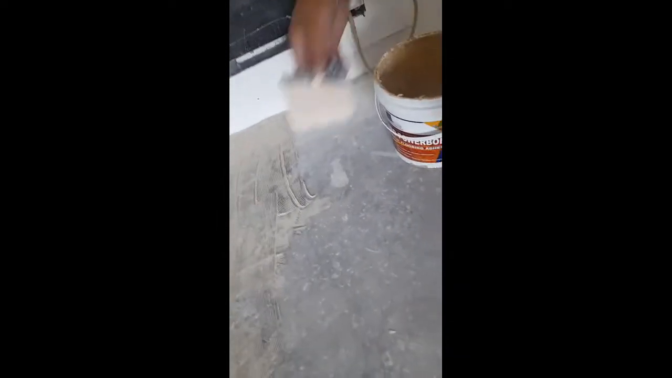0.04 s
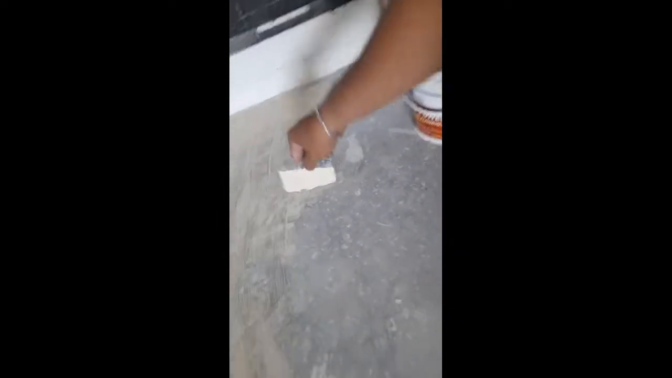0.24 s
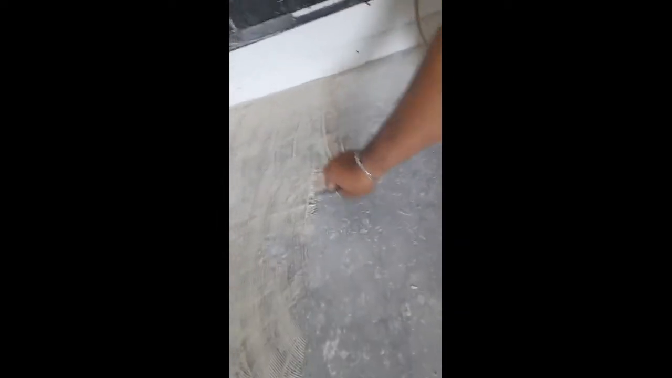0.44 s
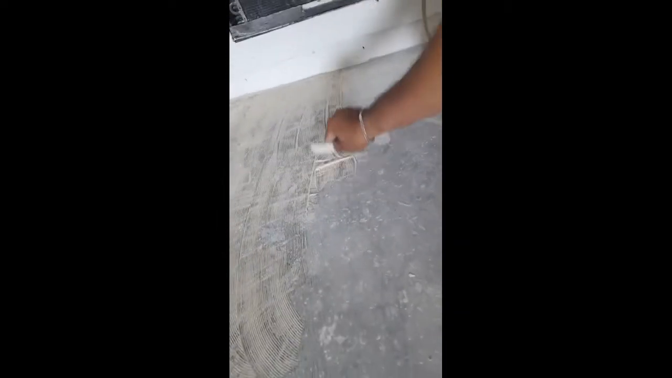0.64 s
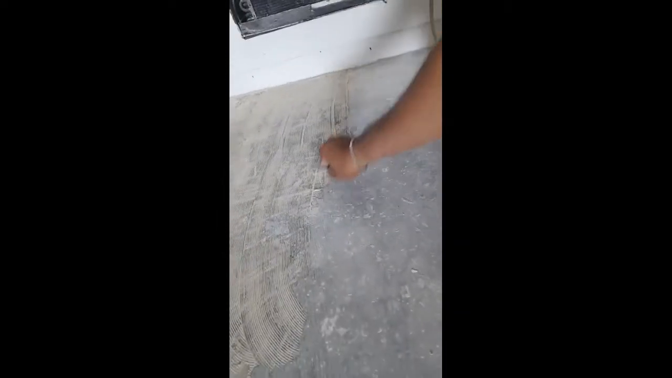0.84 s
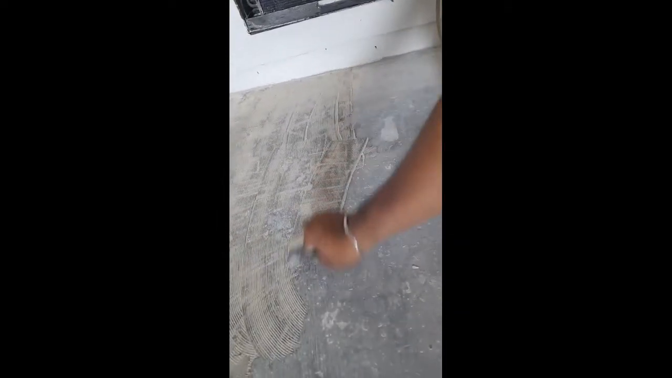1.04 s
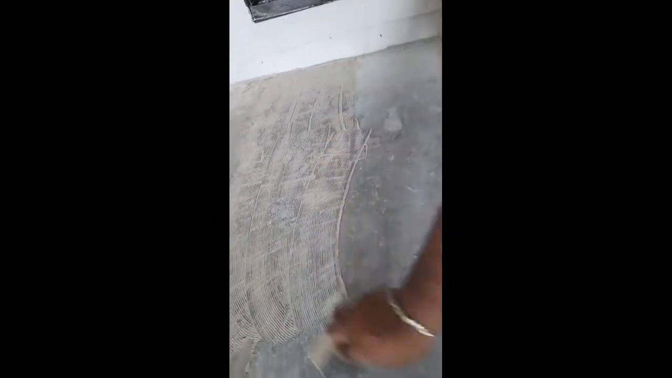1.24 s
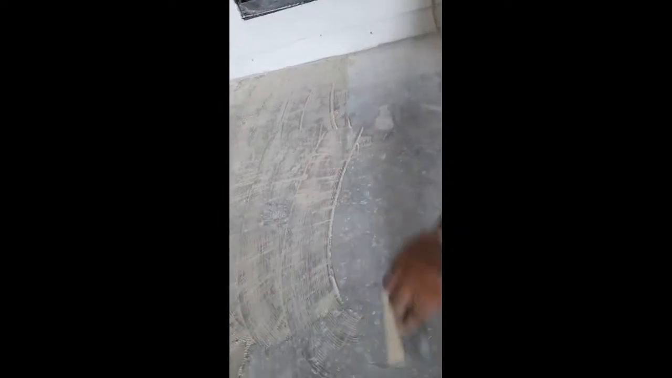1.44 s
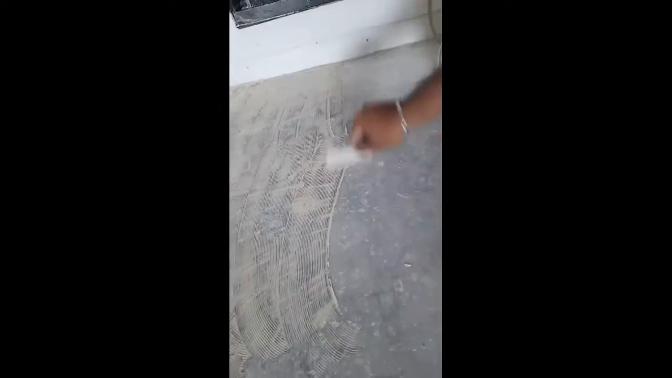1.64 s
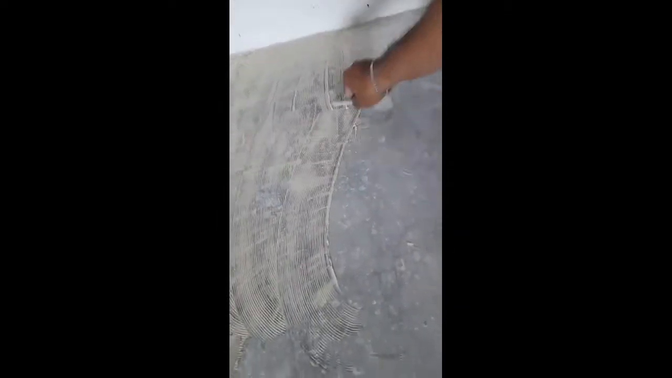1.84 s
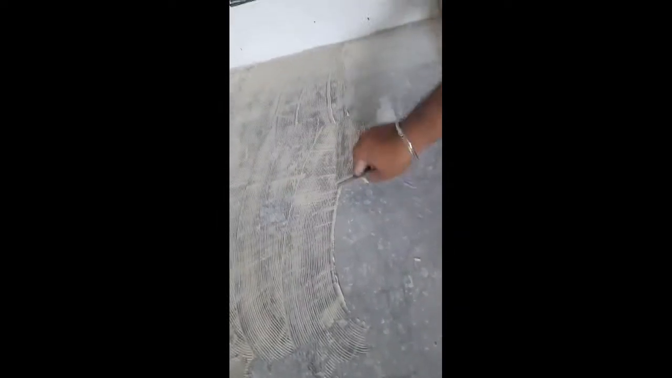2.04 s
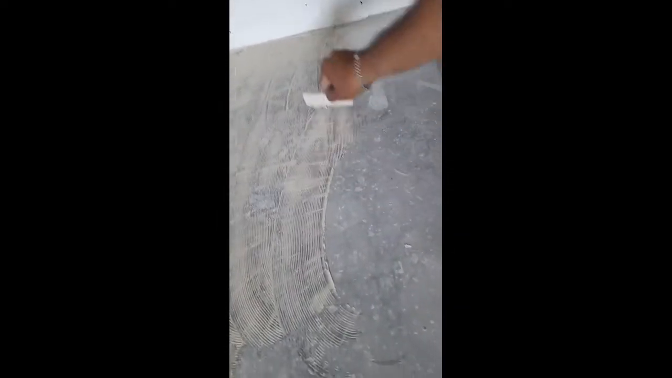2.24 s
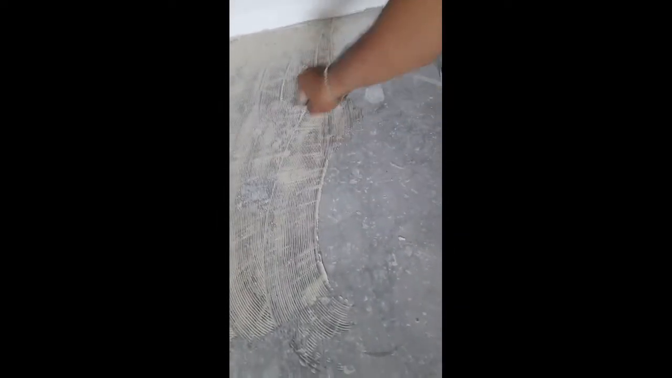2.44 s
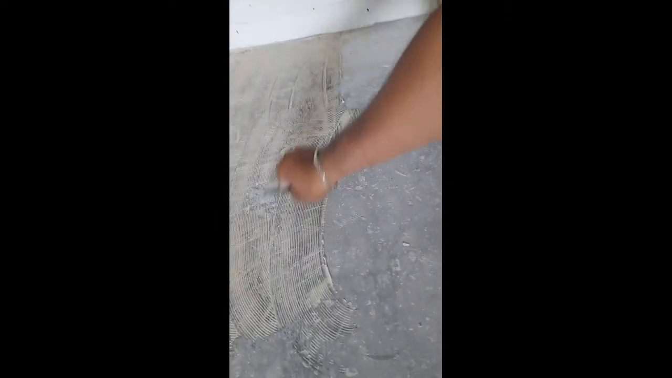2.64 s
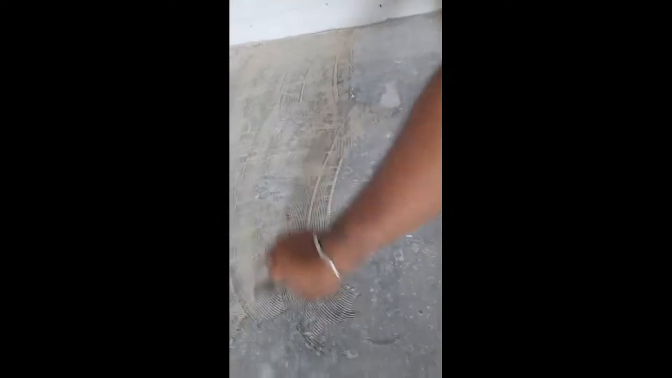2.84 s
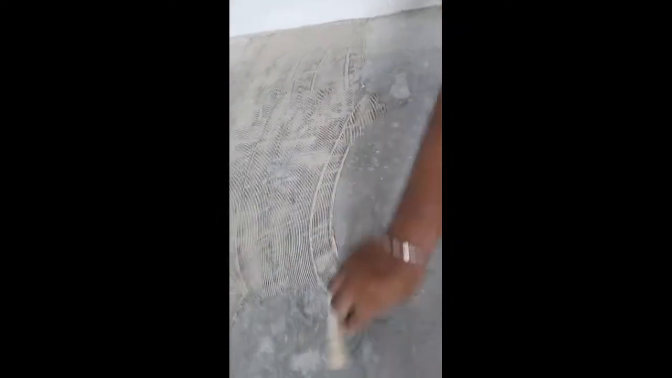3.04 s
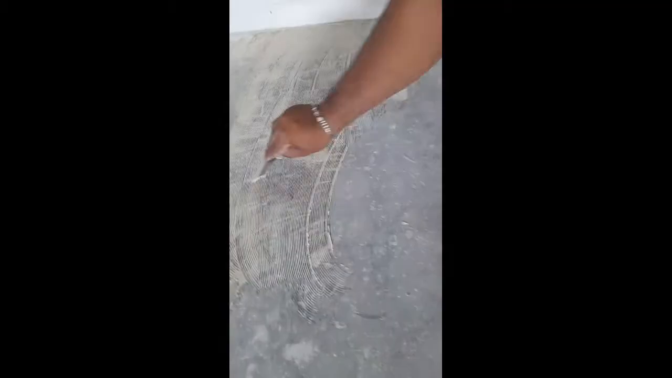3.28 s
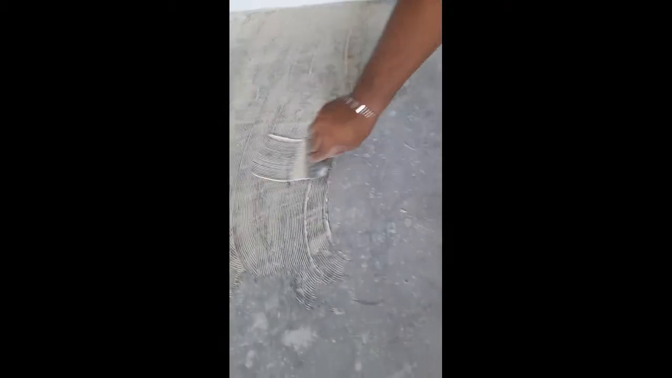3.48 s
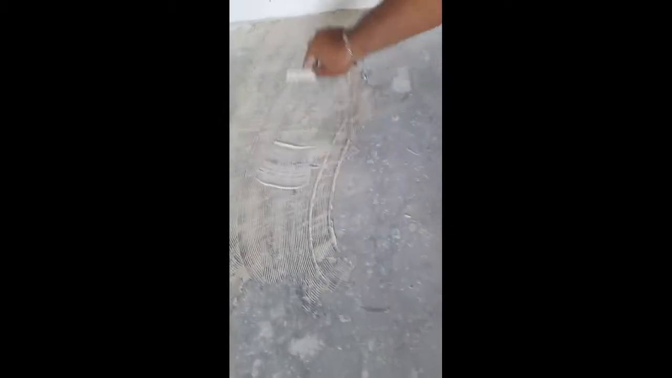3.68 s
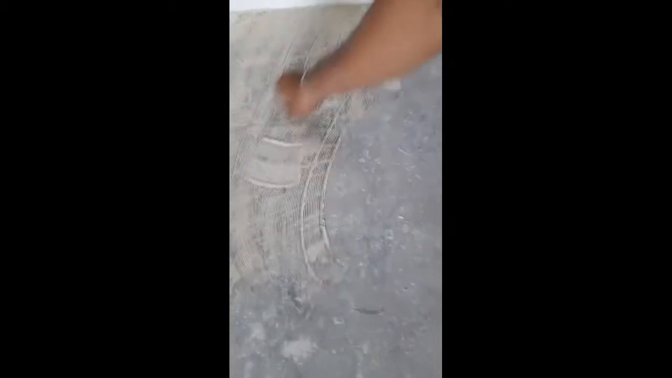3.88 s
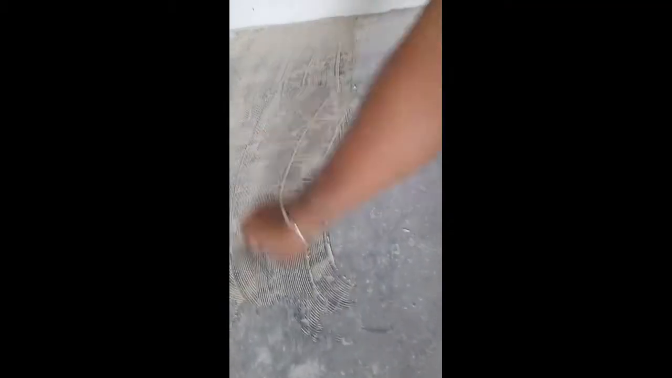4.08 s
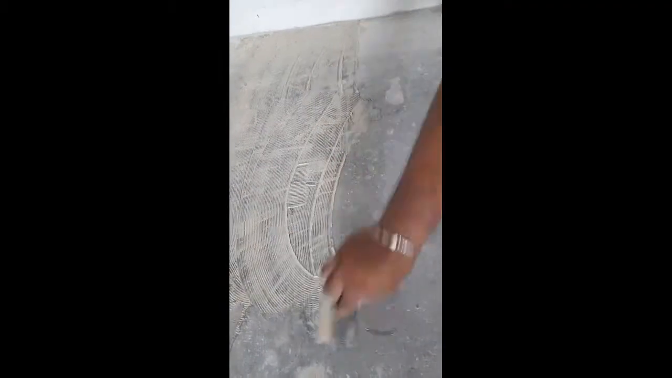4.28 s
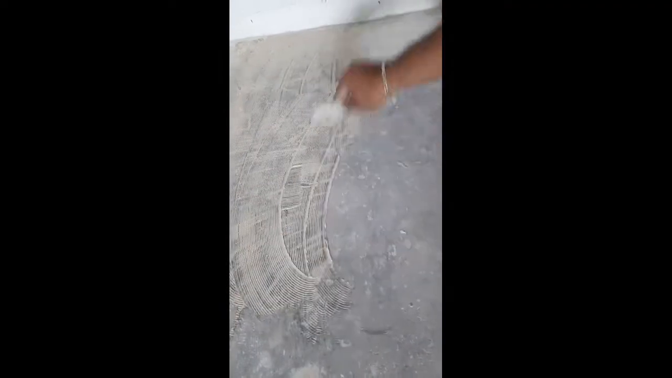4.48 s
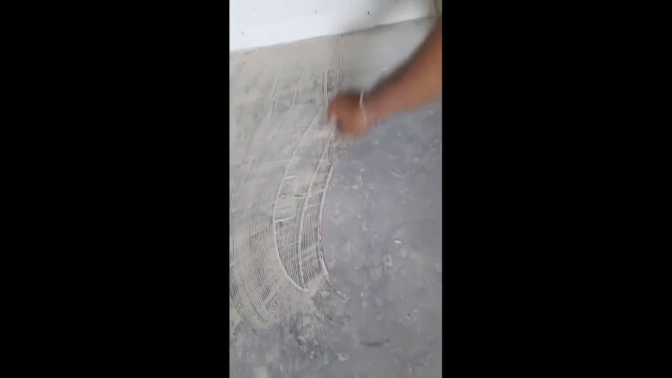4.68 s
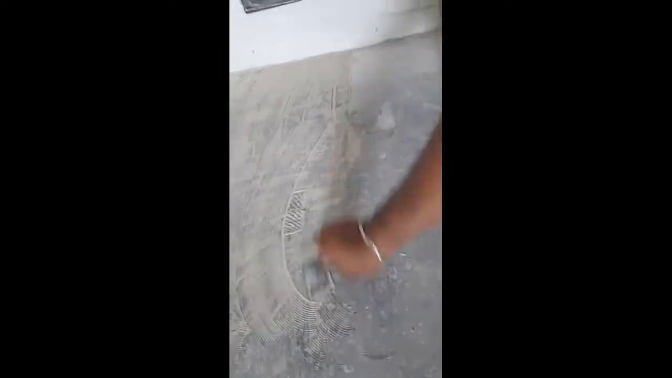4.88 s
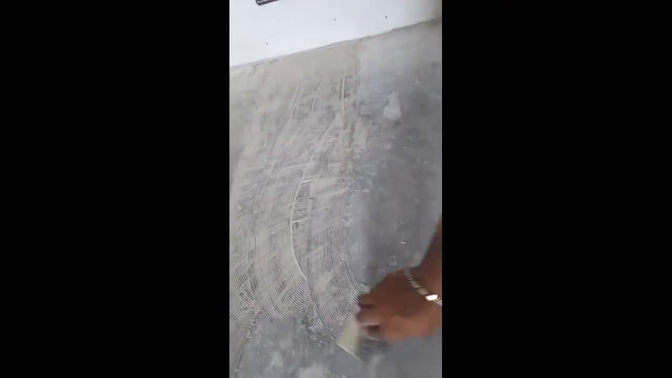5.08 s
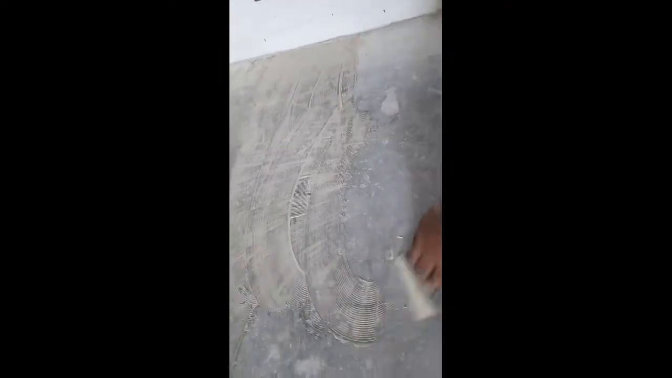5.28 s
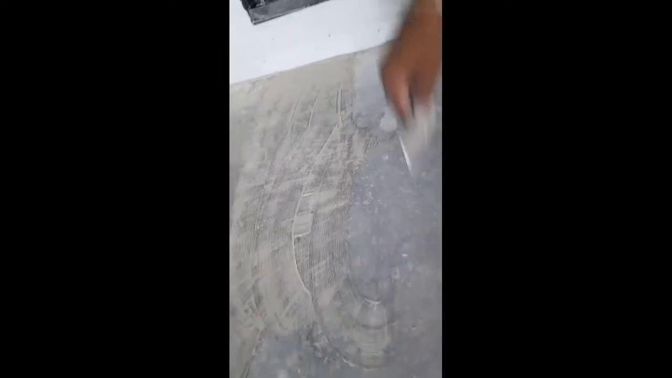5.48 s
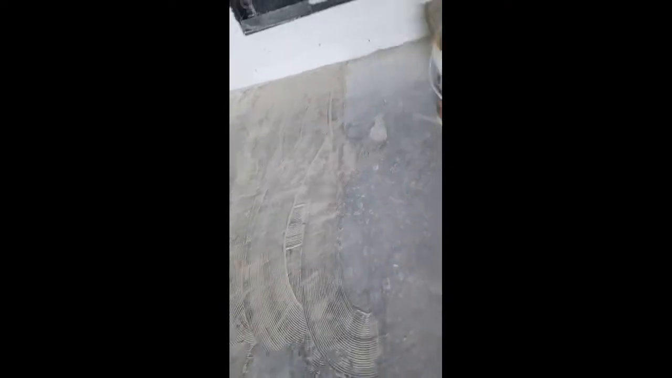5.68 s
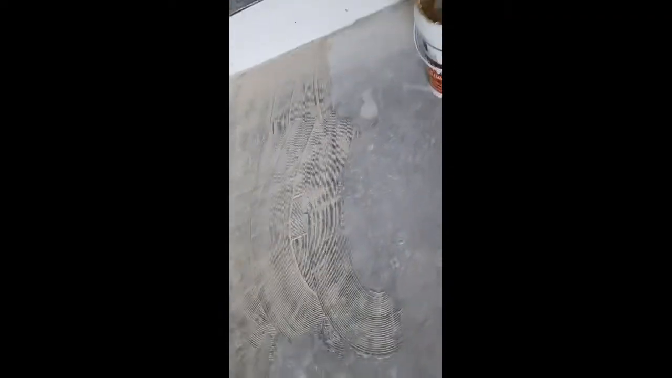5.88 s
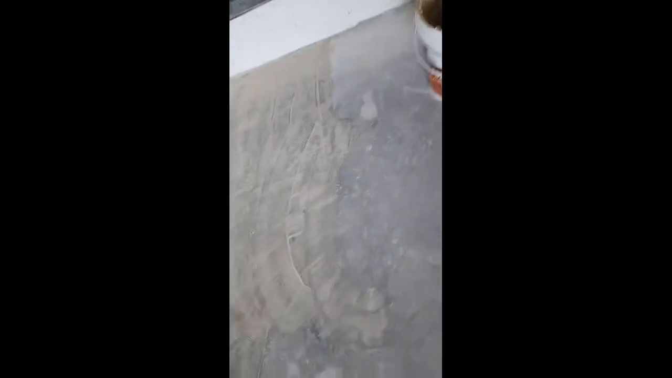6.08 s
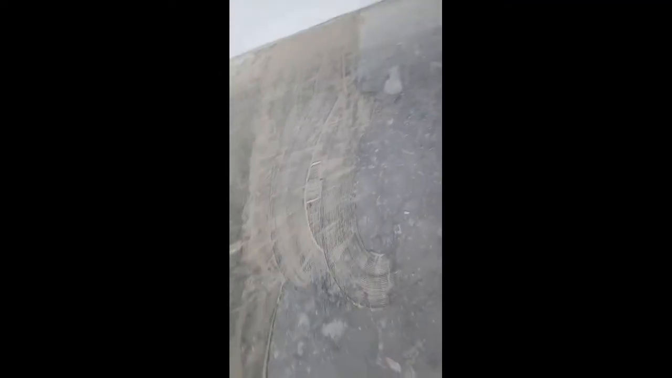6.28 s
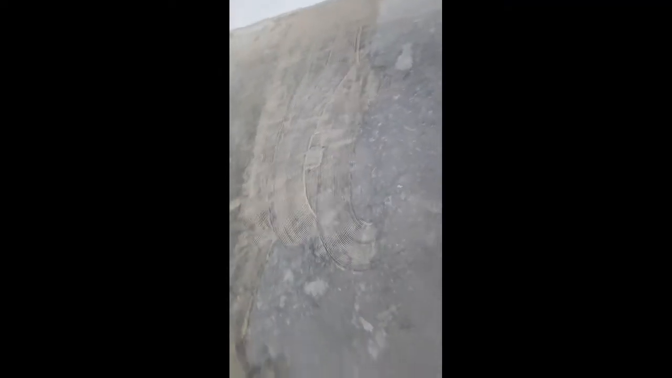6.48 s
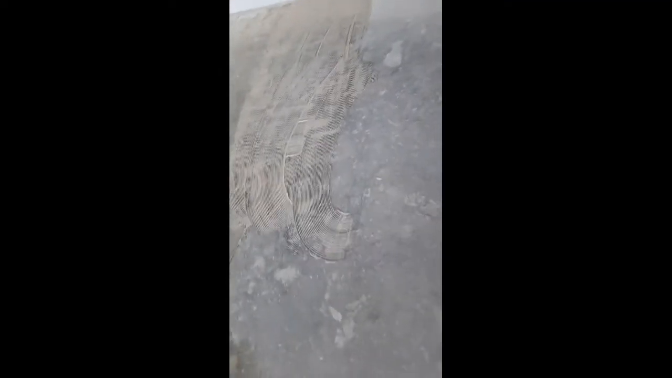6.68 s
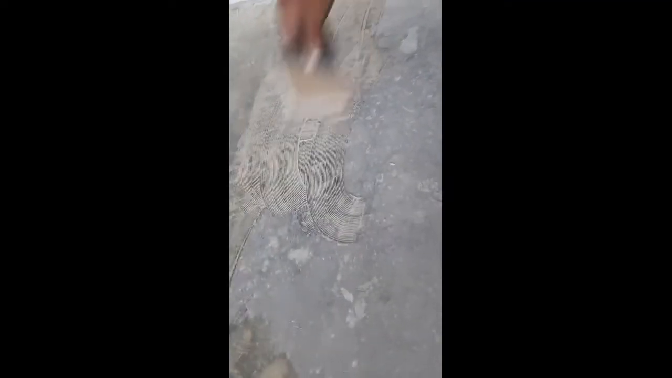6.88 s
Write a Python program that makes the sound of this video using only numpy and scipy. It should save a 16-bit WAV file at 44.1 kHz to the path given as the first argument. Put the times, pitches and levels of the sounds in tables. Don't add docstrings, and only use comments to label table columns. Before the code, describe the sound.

Low phone-handling rumble and a creak, then a notched plastic spreader rasps in five gritty strokes over bare concrete, ending in small bucket knocks.

```python
import sys
import numpy as np
from scipy import signal
from scipy.io import wavfile
from scipy.ndimage import uniform_filter1d

SR = 44100
rng = np.random.default_rng(int(sys.argv[2]) if len(sys.argv) > 2 else 0)


def to_linear_factor(level_db):
    exponent = np.asarray(level_db, float) / 20
    return 10 ** exponent


def inscribe(sig):
    pcm = np.round(np.clip(np.atleast_2d(sig).T, -1, 1) * 32767)
    wavfile.write(sys.argv[1], SR, pcm.astype(np.int16))


N = 305172

# (time [s], pressure [dB], blade bend [dB])
DRAGS = [
    [(.69, -48, 8), (.75, -29.5, 2), (.86, -31, 2), (.942, -33.5, 10), (1.024, -29, -1), (1.172, -33, 0),
     (1.43, -31, -5.5), (1.46, -39.5, -0.5), (1.6, -56, 6)],
    [(1.789, -56, -7), (1.801, -38.5, 3.5), (1.84, -24, -2), (1.925, -23.5, -2.5), (2.071, -48.5, 0),
     (2.231, -53.5, 1)],
    [(2.31, -47.5, -9), (2.38, -28, 1.5), (2.5, -26.5, 1), (2.614, -31, 3.5), (2.804, -29.5, -1.5),
     (2.866, -23.5, -2.5), (2.98, -35.5, -0.5), (3.04, -42.5, 21), (3.1, -52, 12)],
    [(3.77, -41.5, -1), (3.804, -27, -3.5), (3.874, -23, -0.5), (4.1, -33, 0.5), (4.234, -30.5, -3),
     (4.31, -38, -6), (4.442, -56, 6)],
    [(4.588, -47, -13), (4.603, -26, -3), (4.693, -22.5, -1.5), (4.773, -27.5, 3.5), (4.845, -23.5, -7),
     (4.983, -33.5, -1), (5.097, -39.5, -3), (5.295, -31.5, -1), (5.405, -43, -7)],
]
# (extra ring [dB], ring [Hz], share of flex [1], dryness [dB])
DRAG_HOLDS = [(0, 2300, 0.13, -1), (1.5, 2220, 0.016, 2.5), (0.5, 2215, 0.016, 1.15), (0.5, 2230, .03, 1.5),
              (1.5, 2210, 0.033, 1)]
# (full pressure [s], hold [s], pressure [dB], blade bend [dB], extra ring [dB])
BRUSHES = [
    (.003, 0.0074, -45, 10, -8),
    (0.367, 0.034, -40, 8, 7.5),
    (0.414, 0.035, -37.5, 2.7, 5.5),
    (3.345, 0.18, -43.5, 6, -13),
    (3.466, 0.013, -38.5, 3.5, -3),
    (5.89, 0.16, -48.5, 2, -18),
]
# (full pressure [s], hold [s], pressure [dB], blade bend [dB], dryness [dB])
WIPES = [
    (.14, 0.065, -55, 12, 5.5),
    (0.25, 0.064, -43, 8, 4.5),
    (5.512, 0.12, -44, 4, 3),
    (5.853, 0.044, -54.5, -8, 19),
    (5.972, 0.093, -46, 10, 5),
    (6.184, 0.051, -39.5, 3.5, 1.5),
    (6.4, 0.027, -40.5, 8, 5.5),
    (6.466, 0.11, -46, 7.5, 11.5),
    (6.73, 0.042, -44, 8, 4),
    (6.878, .03, -51, 3, 3),
]
# (time [s], pressure [dB], blade bend [dB], extra ring [dB])
LUMPS = [
    (.49, -42, 13, -8),
    (0.844, -32, 19, 4),
    (1.184, -28.5, -3, 1),
    (1.428, -28, -13.5, 12),
    (3.012, -32.5, -10.5, -5),
    (3.046, -29.5, -5, -10),
    (4.058, -25, -7, -6),
    (4.31, -30, -6.5, -0.5),
    (5.3, -28.5, -13.5, 7),
]
# (frequency [Hz], density [dB per Hz])
BLADE_SPECTRUM = [(150, -48.5), (250, -6), (466, -5.5), (583, -6.5), (756, -5), (1070, 0), (1670, -4),
                  (2170, 7), (2960, -7), (3910, -7.5), (6680, -15), (8080, -17.5), (9770, -14.5),
                  (14300, -14), (15600, -18.5)]
# (frequency [Hz], width [Hz], level [dB])
BLADE_RINGS = [(920, 140, -4.5), (1344, 200, -4.5), (3930, 260, -0.5), (4070, 170, -7.5), (4540, 310, 0.5),
               (6160, 430, 2.5), (6870, 1350, -1.5), (9560, 970, 6)]
# (frequency [Hz], left minus right [dB])
STEREO_LEAN = [(60, -23), (130, -11), (290, 2.5), (640, 0), (1410, -2.5), (3100, 3.5), (6820, 3.5),
               (15000, -7)]
# (time [s], peak [dB], thud relative level [dB], left minus right [dB], rattle t60 [s])
TAPS = [(0.634, -28.5, -21, 16, 0.063), (0.6447, -29, -3, 11, 0.06), (1.7576, -22.5, -4, -7.5, 0.018),
        (2.282, -18, -32, 3, 0.055), (3.2674, -42, -6, 4.5, 0.03), (3.313, -20.5, -5, 5, 0.054),
        (3.3177, -16.5, -12, 2, 0.02), (3.7414, -15.5, -11, 9, 0.021), (3.7448, -13.5, -14, -4, 0.014),
        (4.5499, -13, -16, 3, 0.056), (4.5569, -22, -9, 13, 0.075), (5.847, -35, -24, 7, 0.09)]
# (frequency [Hz], density [dB per Hz])
TICK_SPECTRUM = [(290, -30), (500, -9.5), (696, -17.5), (1830, -7.5), (2110, -7.5), (2510, 1.5), (3640, -8),
                 (4030, -1), (4460, -12), (6670, -10.5), (8270, -24), (14300, -23.5), (15600, -60)]
# (time [s], level [dB])
BUCKET_RUBS = [
    [(5.94, -82), (5.964, -42), (5.988, -33), (6.052, -35), (6.138, -46.5), (6.16, -62)],
    [(6.394, -52), (6.402, -29.5), (6.5, -42.5), (6.57, -40), (6.62, -62), (6.72, -53)],
]
# (frequency [Hz], width [Hz], level [dB])
WALL_MODES = [(478, 73, 2.5), (548, 49, 7), (588, 72, 1), (650, 26, -2), (994, 70, -11.5), (1170, 77, -16),
              (1345, 22, 1.5), (1520, 70, -23)]
# (time [s], peak [dB])
BUCKET_KNOCKS = [
    (5.993, -32),
    (6.024, -29),
    (6.401, -27),
    (6.419, -22),
]
# (time [s], case tone [dB], rumble [dB], rub [dB])
GRIP = [
    (0.0, -17.5, -6, -35),
    (0.032, -18, -24, -38.5),
    (0.116, -12.5, -22.5, -41),
    (0.162, -26, -13, -28),
    (0.188, -8.5, -19, -25),
    (0.244, -10.5, -30, -20.5),
    (0.262, -18, -43, -42),
]
# (time [s], peak [dB], frequency [Hz])
JOLTS = [
    (.1981, 2.2, 310),
    (.183, -6, 150),
    (.2180, -9, 190),
    (.2405, -9, 200),
]
# (start [s], end [s], frequency [Hz], rms level [dB])
CASE_WHINE = (.04, .125, 605, -45)
CREAK_SPAN = .3905, .4180
# (frequency [Hz], rms level [dB], lead of the right port [rad])
CREAK_PARTIALS = [(237.4, -25.5, 1.7), (559.6, -12.5, 1.76), (1148, -30, 1.8), (1400, -38, 1)]
# (frequency [Hz], density [dB per Hz])
AIR_SPECTRUM = [(15, -54), (25, -16.5), (215, -1.5), (267, -9.5), (400, -11.5), (599, -18.5), (1270, -22),
                (2070, -33.5), (2300, -36), (2780, -40), (6760, -36), (8390, -56), (9860, -37),
                (14000, -48), (15600, -75)]
# (frequency [Hz], width [Hz], level [dB])
FAN_TONES = [(56, 12.6, -65.5), (205.1, 21.6, -50.5), (394.8, 32, -62)]
# (frequency [Hz], t60 [s])
ROOM_DECAY = [(200, 1), (1000, 0.53), (4000, 0.61), (12000, 0.45)]

TOUCH_DB_PER_S, LIFT_DB_PER_S, JUMP_DB_PER_S = 425, 163, 593
OFF_DB = -68
LOOSE_RING_HZ, LOOSE_FLEX = 2480, 0.095


def scrape():
    press_db, bend_db, extra_db, dry_db, ring_hz = contact()
    body_db = -5 + 0.95 * bend_db
    ring_db = -0.16 + 0.68 * bend_db + extra_db
    edge_db = -4 + 0.77 * dry_db
    fine_db = -7.5 + 0.2 * bend_db + dry_db
    load_db = np.maximum(press_db, -50) + 30
    pan_db = 0.25 - 0.06 * load_db

    judder = to_linear_factor(1.0 * wander(25) + 0.59 * wander(73))
    near = grit(3000, spread_db=3.5)
    ends = [grit(6000, spread_db=2.0) + 0.67 * np.roll(near, shift=lag) for lag in (11, 0)]
    catch = judder * np.array(ends)

    rung = np.zeros((2, N))
    for hz, width, db in BLADE_RINGS:
        swell = to_linear_factor(db - 3 + 2.5 * wander(25))
        rung += swell * resonate(catch, hz * (1 + .03 * wander(5)), width)
    rung += to_linear_factor(9 + .6 * np.clip(ring_db, -12, 2)) * resonate(catch, ring_hz, 150)
    rung *= np.clip((press_db + 48) / 20, .15, 1)

    sides = np.array([[.5], [-.5]])
    blade = [colour(c, lambda hz: read(BLADE_SPECTRUM, hz) + side * read(STEREO_LEAN, hz))
             for c, side in zip(catch + 2 * rung, sides)]
    blade = patches(np.array(blade), depth_db=2.5)
    parts = [(290, 1670, body_db), (1707, 2884, ring_db), (2830, 4860, -2.5),
             (5230, 6850, edge_db), (7850, 21200, fine_db)]
    out = np.zeros((2, N))
    for lo_hz, hi_hz, db in parts:
        out += to_linear_factor(press_db + db + sides * pan_db) * evened(band(blade, lo_hz, hi_hz))
    return out


def contact():
    t = np.arange(0, N + 64, 64) / SR
    edges = TOUCH_DB_PER_S, LIFT_DB_PER_S
    bow = np.interp(t, np.arange(N) / SR, np.clip(wander(8.4), -2, 2))
    loose = LOOSE_RING_HZ * (1 + LOOSE_FLEX * bow)

    # (curve rows, extra ring, dryness, ring Hz, rise, fall)
    touches = []
    for rows, (ring, hz, flex, dry_db) in zip(DRAGS, DRAG_HOLDS):
        touches.append((rows, ring, dry_db, hz * (1 + flex * bow), *edges))
    for s, hold, db, bend, ring in BRUSHES:
        touches.append(([(s, db, bend), (s + hold, db, bend)], ring, 0, loose, *edges))
    for s, hold, db, bend, dry_db in WIPES:
        touches.append(([(s, db, bend), (s + hold, db, bend)], -9, dry_db, loose, *edges))
    for s, db, bend, ring in LUMPS:
        touches.append(([(s, db, bend)], ring, 0, LOOSE_RING_HZ, JUMP_DB_PER_S, JUMP_DB_PER_S))

    power = to_linear_factor(2 * OFF_DB) + 0 * t
    state = np.zeros((4, len(t)))
    state[3] = power * LOOSE_RING_HZ
    for rows, ring, dry_db, hz, rise, fall in touches:
        s, db, bend = np.transpose(rows)
        before, after = np.maximum(s[0] - t, 0), np.maximum(t - s[-1], 0)
        press = np.interp(t, s, db) - rise * before - fall * after
        share = to_linear_factor(2 * np.maximum(press, -150))
        power = power + share
        state = state + share * np.array([np.interp(t, s, bend), ring + 0 * t, dry_db + 0 * t, hz + 0 * t])
    curves = 10 * np.log10(power), *state / power
    return [np.interp(np.arange(N) / SR, t, v) for v in curves]


def grit(per_s, spread_db):
    size = to_linear_factor(spread_db * np.minimum(rng.exponential(1, N), 5)) * rng.choice([-1., 1.], N)
    return evened(size * (rng.random(N) < per_s / SR))


def patches(x, depth_db):
    hz, t, z = signal.stft(x, nperseg=512)
    field = rng.standard_normal(z.shape[:0:-1]).T
    field = uniform_filter1d(uniform_filter1d(field, size=5, axis=0), size=7, axis=1)
    return signal.istft(z * to_linear_factor(depth_db * evened(field)), nperseg=512)[1][..., :N]


def taps():
    out, t = np.zeros((2, N)), np.arange(2600) / SR
    for s, db, thud_db, pan_db, t60 in TAPS:
        decay = to_linear_factor(-60 * t / t60) + 0.95 * to_linear_factor(-60 * t / 0.0036)
        rattle = rng.standard_normal((2, len(t))) * decay
        crossed = rattle + .5 * np.roll(rattle[::-1], 9, axis=1)
        tick = np.array([colour(r, lambda hz: read(TICK_SPECTRUM, hz)) for r in crossed])
        pan = to_linear_factor(np.array([[pan_db / 2], [-pan_db / 2]]))
        thud = to_linear_factor(thud_db - 60 * t / 0.021) * np.sin(2 * np.pi * 330 * t)
        add(out, s + 0.0015, to_linear_factor(db) * (tick / abs(tick).max() * pan + 0.63 * thud))
    return out


def bucket():
    t, first = np.arange(N) / SR, round(BUCKET_RUBS[0][0][0] * SR)
    on = sum((t > rows[0][0]) & (t < rows[-1][0]) for rows in BUCKET_RUBS)
    slips = (grit(2500, spread_db=3.0) * to_linear_factor(0.82 * wander(40)))[first:]
    rubbed = 0
    for hz, width, db in WALL_MODES:
        rubbed = rubbed + to_linear_factor(db) * resonate(resonate(slips, hz, 1.5 * width), hz, 1.5 * width)
    gate = uniform_filter1d(on * 1., size=100)
    wall = np.pad(evened(rubbed), (first, 0)) * to_linear_factor(columns(BUCKET_RUBS)[0]) * gate

    t = t[:6000]
    ring = sum(to_linear_factor(.5 * db - 20 * width * t) * np.sin(2 * np.pi * hz * t) for hz, width, db in WALL_MODES)
    for s, db in BUCKET_KNOCKS:
        add(wall, s - .001, to_linear_factor(db - 9) * ring)
    return np.array([to_linear_factor(0.5) * np.roll(wall, shift=14), to_linear_factor(-1.0) * wall])


def handling():
    t = np.arange(N) / SR
    tone_db, rumble_db, rub_db = columns([GRIP])
    turns = 2 * np.pi * np.cumsum(119 * (1 + 0.04 * wander(34))) / SR
    rumble = evened(band(rng.standard_normal(N), 45, 124))
    rough = evened(band(rng.standard_normal(N), 160, 485))
    rub = 1.1 * np.cos(2 * turns + 0.41) + 0.8 * np.cos(3 * turns + 1.7) + 0.56 * rough
    shake = to_linear_factor(tone_db) * np.sqrt(2) * np.cos(turns) + to_linear_factor(rumble_db) * rumble + to_linear_factor(rub_db) * rub
    for s, db, hz in JOLTS:
        bell = np.exp(-((t - s) * hz / .62) ** 2)
        jolt = to_linear_factor(db) * bell * np.sin(2 * np.pi * hz * (t - s) + .25)
        shake = shake * (1 - bell) - jolt
    start, end, hz, db = CASE_WHINE
    swell = np.sin(np.pi * np.clip((t - start) / (end - start), 0, 1)) ** .5
    shake += to_linear_factor(db) * np.sqrt(2) * np.sin(2 * np.pi * hz * t) * swell
    return shake * np.clip((GRIP[-1][0] - t) / .00015, 0, 1)


def creak():
    t, (start, end) = np.arange(N) / SR, CREAK_SPAN
    right = np.array([[0], [1]])
    buzz = np.zeros((2, N))
    for hz, db, lead in CREAK_PARTIALS:
        level = to_linear_factor(db + 1.4 * wander(90)) * np.sqrt(2)
        buzz += level * np.sin(2 * np.pi * hz * (t - start) + lead * right)
    buzz += to_linear_factor(-29.5) * evened(band(rng.standard_normal(N), 40, 340))
    return buzz * to_linear_factor(3.7 * (right - 1.0)) * np.clip((t - start) / 0.0054, 0, 1) * (t < end)


def hum():
    frames, hz = N // 512 + 5, np.fft.rfftfreq(2048, 1 / SR)
    a, b, c, d = rng.standard_normal((frames, len(hz), 4)).T
    z = np.array([a + 1j * b, c + 1j * d]) * to_linear_factor(read(AIR_SPECTRUM, hz))[:, None]
    air = to_linear_factor(-45) * evened(signal.istft(z, nperseg=2048, noverlap=1536)[1][:, :N])
    for hz, width, db in FAN_TONES:
        tone = resonate(resonate(rng.standard_normal(N), hz, width), hz, width)
        air += to_linear_factor(db + 1.0 * wander(27)) * evened(tone)
    return air


def room(x):
    echoes = np.zeros((2, SR))
    at = np.arange(200, SR - 20, 20) + rng.integers(0, 20, (2, (SR - 201) // 20))
    np.put_along_axis(echoes, at, rng.choice([-1., 1.], at.shape), 1)
    hz, t, z = signal.stft(echoes, SR, nperseg=256)
    decay = to_linear_factor(-60 * t / read(ROOM_DECAY, hz)[:, None])
    tail = signal.istft(z * decay, SR, nperseg=256)[1]
    return signal.fftconvolve(x, tail / np.linalg.norm(tail[0]), axes=1)[:, :N]


def evened(x):
    return x / np.sqrt(np.mean(x ** 2) + 1e-20)


def read(points, hz):
    f, value = np.transpose(points)
    return np.interp(np.log(hz + 1), np.log(f + 1), value)


def columns(tables):
    s, *values = np.transpose(np.concatenate(tables))
    return [np.interp(np.arange(N) / SR, s, v) for v in values]


def add(mix, s, sound):
    part = mix[..., round(s * SR):][..., :sound.shape[-1]]
    part += sound[..., :part.shape[-1]]


def band(x, lo_hz, hi_hz):
    return signal.sosfilt(signal.butter(N=3, Wn=[lo_hz, hi_hz], btype="band", fs=SR, output="sos"), x)


def wander(hz):
    steps = rng.standard_normal(N // 64 + 2)
    smooth = signal.sosfiltfilt(signal.butter(N=2, Wn=hz, fs=SR / 64, output="sos"), steps)
    return np.interp(np.arange(N) / 64, np.arange(len(steps)), evened(smooth))


def resonate(x, hz, width):
    turn = np.exp(2j * np.pi * np.cumsum(hz * np.ones(x.shape[-1])) / SR)
    r = np.exp(-np.pi * width / SR)
    return 2 * (turn * signal.lfilter([1 - r], [1, -r], x / turn + 1e-18)).real


def colour(x, db_of_hz):
    gain_db = db_of_hz(abs(np.fft.fftfreq(2048, 1 / SR)))
    log_gain = np.log(to_linear_factor(np.maximum(gain_db, -100)))
    response = np.fft.ifft(np.exp(np.conj(signal.hilbert(log_gain)))).real[:1024]
    return signal.oaconvolve(x, response)[:len(x)]


def scene():
    tool = scrape() * to_linear_factor(1.5) + taps() + bucket()
    air = tool + to_linear_factor(-8.0) * room(tool) + hum()
    low = signal.sosfiltfilt(signal.butter(N=2, Wn=404, fs=SR, output="sos"), air)
    return air - 0.73 * (low - low.sum(0) * 0.68) + handling() + creak()


def band_limit(x):
    return signal.sosfilt(signal.butter(12, 15730, fs=SR, output="sos"), x)


def record(dry):
    cut = signal.sosfilt(signal.butter(N=1, Wn=30, btype="high", fs=SR, output="sos"), dry)
    edge = signal.firwin(511, 15750, window=("kaiser", 9), fs=SR)
    edged = signal.oaconvolve(cut, edge[None], "same")
    return band_limit(np.clip(edged, -.98, .98))


dry = scene()
out = record(dry)
inscribe(out)
```